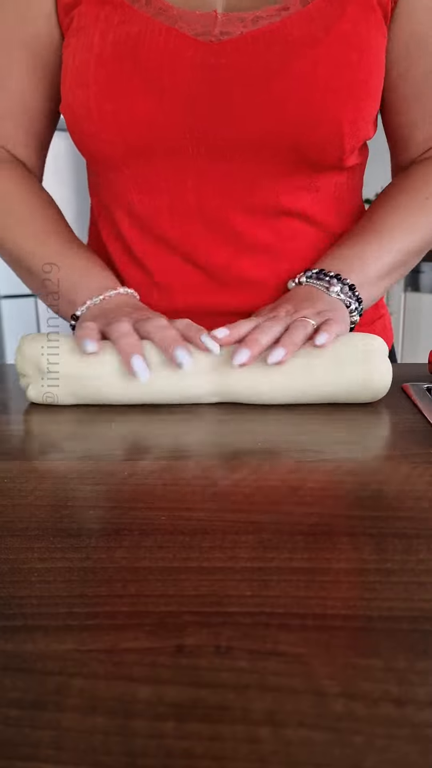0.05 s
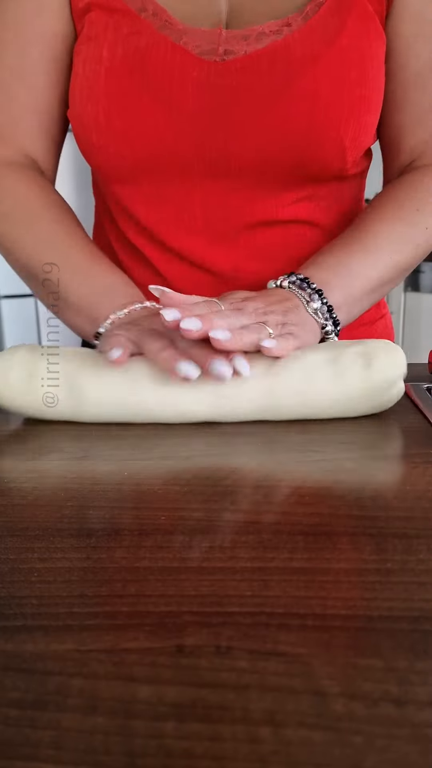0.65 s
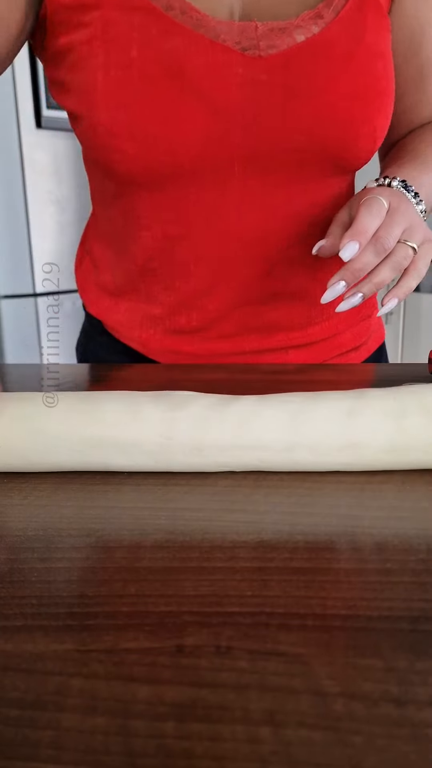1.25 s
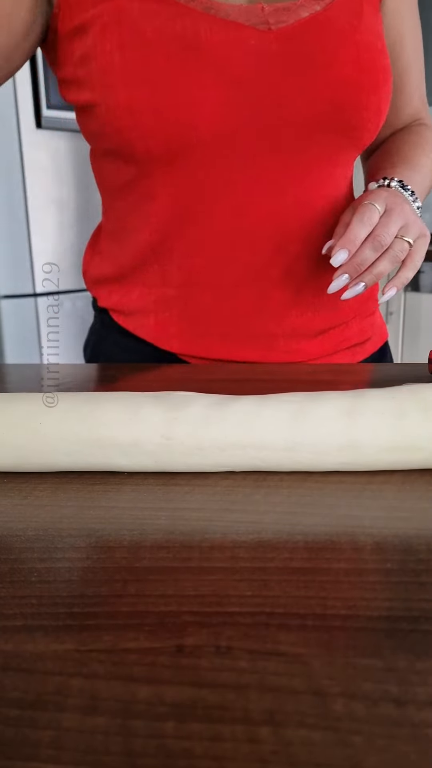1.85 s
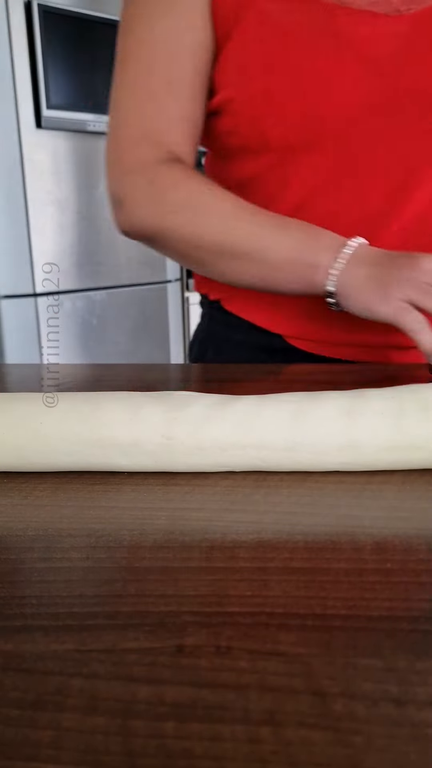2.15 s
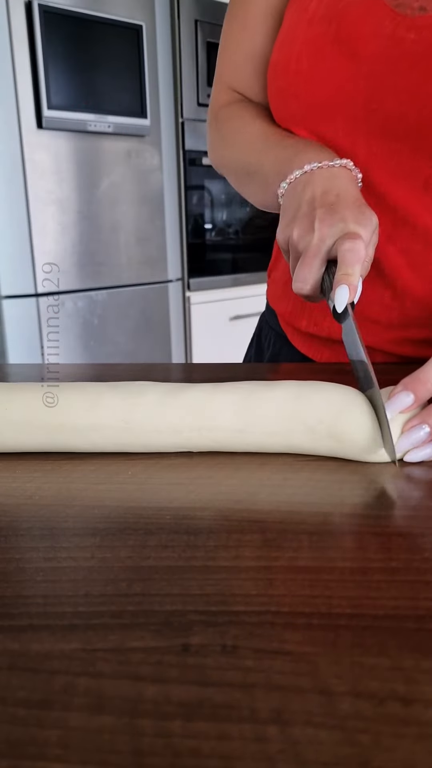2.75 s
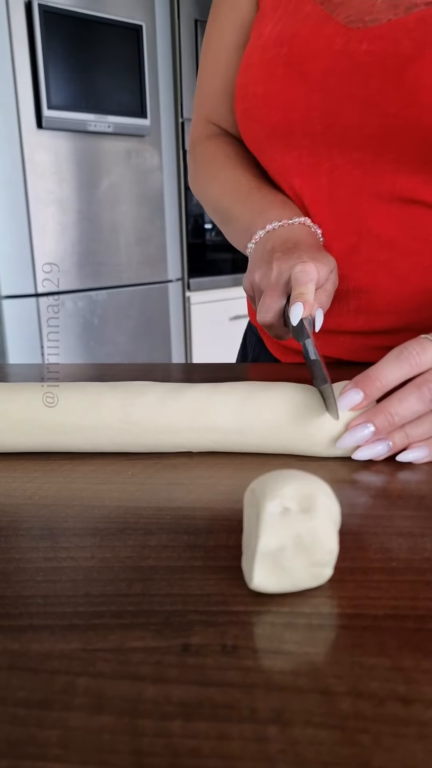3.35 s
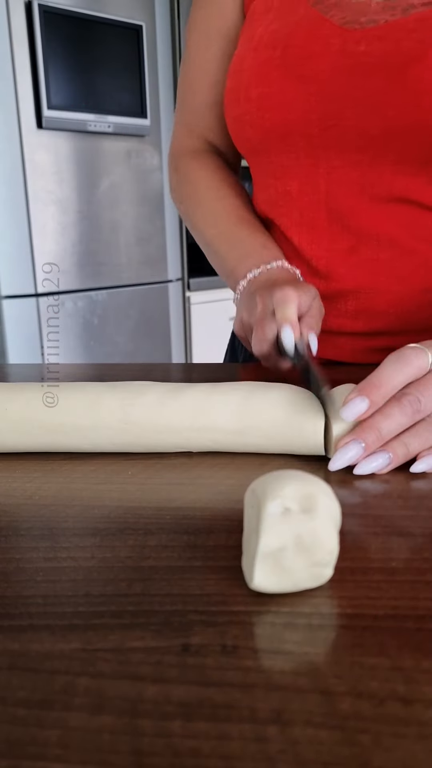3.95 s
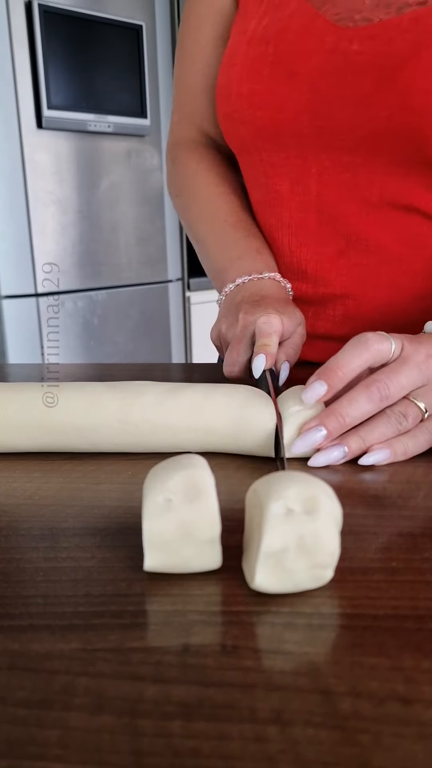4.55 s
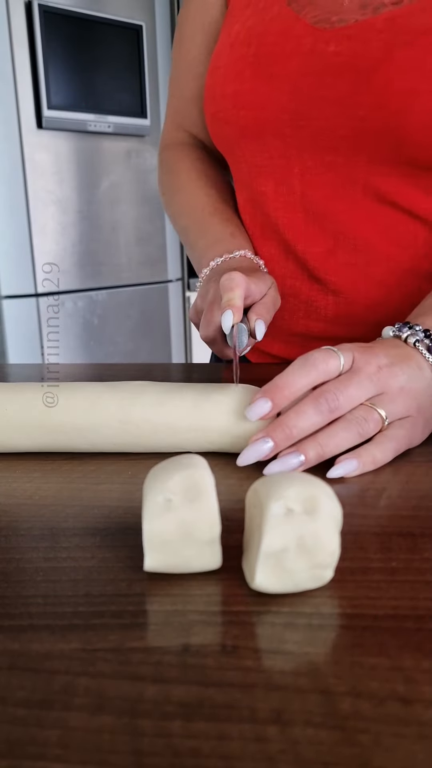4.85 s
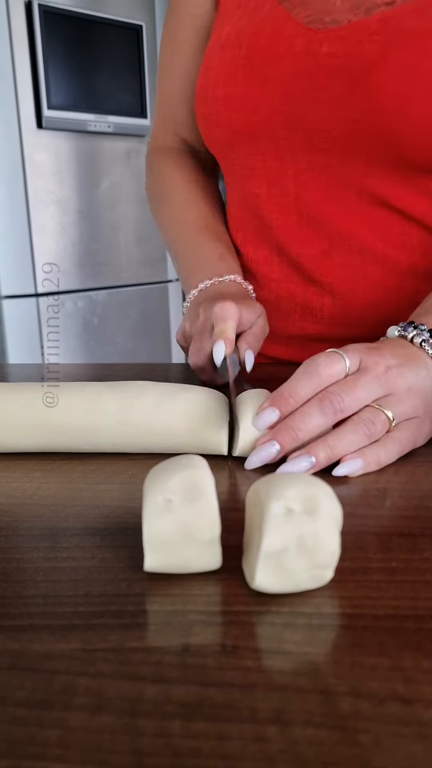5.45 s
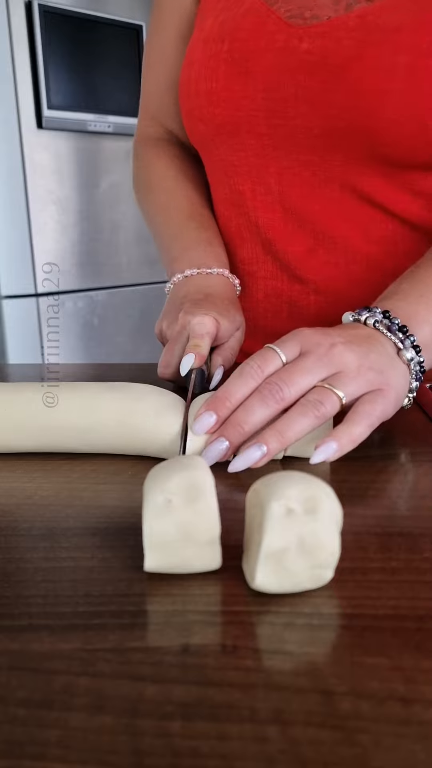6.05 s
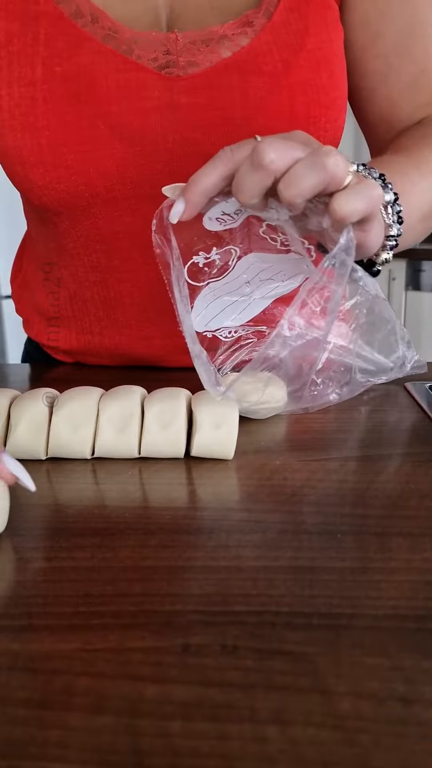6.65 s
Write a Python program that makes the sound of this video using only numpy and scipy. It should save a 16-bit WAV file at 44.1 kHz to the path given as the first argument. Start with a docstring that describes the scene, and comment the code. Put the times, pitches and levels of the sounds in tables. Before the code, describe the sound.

For the first two seconds, palms slide over a roll of dough in faint, hissing strokes, with soft thuds around 1.0 and 1.6 seconds and small ticks of nails and bracelets on a wooden table. At about 2.4 seconds a knife is picked up with a bump and a quick double rasp. Five cuts follow, near 2.8, 3.6, 4.4, 5.3 and 6.1 seconds, each a sharp knock of blade on wood with a short kitchen echo. The last three are louder, with a brief gritty crunch leading into the knock. Between cuts the blade taps and scrapes lightly, ringing faintly just after 3 seconds and clicking several times around 4.7. A short, low hum from the table follows most strokes. From about 6.4 seconds a thin plastic bag crinkles with sharp snaps. Everything is close and in stereo, over very faint room tone.

```python
"""Palms hiss and pat over a roll of dough on a wooden kitchen table; nails and bracelets tick on the wood.
A knife is picked up and cuts five pieces: each impact excites the modes of blade and table and the
kitchen's reverberation, a short low hum follows most strokes, and the blade scrapes free by friction.
At the end a plastic bag is snatched up and its film crumples. Two close microphones pick up the sound."""
import sys
import numpy as np
from scipy import signal
from scipy.fft import rfft, irfft, next_fast_len
from scipy.io import wavfile

SR = 44100
rng = np.random.default_rng(int(sys.argv[2]) if len(sys.argv) > 2 else 0)


def unload_wav(signal):
    """Save mono or channel-first audio to the path in sys.argv[1] as 16-bit WAV at rate SR, clipped to [-1, 1]."""
    wavfile.write(
        sys.argv[1],
        SR,
        np.round(np.clip(np.atleast_2d(signal).T, -1, 1) * 32767).astype(np.int16),
    )


N = 295029
T = np.arange(N) / SR
SHORT = np.arange(8192) / SR  # time axis of one brief event


# modes of the table, and upper modes of the blade on the wood: f/Hz, bandwidth/Hz, level/dB
TABLE_MODES = [(160.6, 42, 3), (304.7, 41, -1), (391.8, 105, 1), (461, 57, -2), (576.5, 68, 0)]
BLADE_MODES = [(2757, 290, -12), (3600, 120, -12), (5785, 330, -19), (6430, 1000, -18.5)]
# knife strokes: t/s, grinding level/dB, table gain/dB, favoured table f/Hz, upper mode gain/dB,
# crack gain/dB, left minus right/dB, room feed/dB
CUTS = [(2.8264, -30.5, -1.5, 560, -17, -24.5, -1, -3.5), (3.6085, -31, -5, 492, -13.5, -20, 0, -2.5),
        (4.3872, -10.5, -13, 348, -11.5, -22, 1.5, -6), (5.2525, -8.5, -15, 332, -11.5, -20.5, 1.5, -6),
        (6.0705, -6.5, -15.5, 410, -34, -36, .5, -7)]

def cuts(knock_db=-9.2, crunch_s=0.0028, crunch_db=-20, favour_octaves=0.67):
    """Modal excitation: the edge grinds through dough, then hits wood. Returns direct sound, room feed."""
    direct, feed = np.zeros((2, 2, N))
    for piece, (s, grind_db, body_db, body_hz, upper_db, crack_db, pan_db, room_db) in enumerate(CUTS):
        # with each piece the edge grinds longer and its resonance rises and broadens
        grind_s = .0155 + piece * .0022
        edge_hz, width_hz = 1488 + piece * 50, 416 + piece * 78
        lead = 2 * grind_s
        t = SHORT - lead
        grind = grit(len(t)) * (t < 0) / (1 + np.exp(-(t + 0.87 * grind_s) / (0.16 * grind_s)))
        # one clean blow with a brief crunch behind it
        blow = microphones(signal.unit_impulse(len(t), int(lead * SR)))
        knock = blow + amp(crunch_db) * grit(len(t)) * (t >= 0) * np.exp(-np.abs(t) / crunch_s)
        # the point of impact favours some of the table's modes
        body = [(f, w, db - 6 * abs(np.log2(f / body_hz)) / favour_octaves) for f, w, db in TABLE_MODES]
        sound = 0
        for force, db, seconds in ((grind, grind_db, 0.68 * grind_s), (knock, knock_db, .003)):
            edge = signal.lfilter(*signal.butter(4, 1150, "high", fs=SR), force)
            blade = set_energy(resonate(edge, [(edge_hz, width_hz, 0)]), db, seconds)
            table = set_energy(resonate(force, body), db + body_db, seconds)
            upper = set_energy(resonate(force, BLADE_MODES), db + upper_db, seconds)
            broadband = colour(force, [(6500, -7), (10000, -6), (16000, -16)])
            crack = set_energy(broadband, db + crack_db, seconds)
            sound = sound + (blade + upper + crack) * pan(pan_db) + table
        add(direct, s - lead, sound)
        add(feed, s - lead, sound * amp(room_db))
    return direct, feed


# friction spectra of skin on dough and of dough on wood: f/Hz, level/dB
SKIN = [(800, -12), (1800, -6), (3000, 2.5), (4800, -0.5), (7400, 4), (8500, -0.5), (10000, -14),
        (13000, -42)]
DOUGH = [(100, -8.5), (200, -20), (280, 1), (430, -5), (850, -2.5), (1400, -1.5), (2000, -12.5),
         (4000, -30)]
# spectrum of a thin, very high hiss that accompanies each palm stroke: f/Hz, level/dB
HIGH_HISS = [(7000, -23), (9500, -13.5), (11700, 1), (15500, -2)]
# palm strokes, in relative levels: t/s, duration/s, skin level/dB, skin fade/(dB/s),
# high hiss level/dB, rubbing level/dB
STROKES = [(0.0, 0.03, -52, 0, -48.5, -67), (0.092, 0.025, -53, 0, -46.5, -79),
           (0.162, 0.12, -53, -8, -53.5, -54.5), (0.363, 0.081, -47.5, 17, -50, -63.5),
           (0.505, 0.099, -60, 0, -62.5, -65), (0.68, 0.07, -44, 78, -46, -56.5),
           (0.802, 0.083, -45.5, -2, -42, -55.5), (0.994, .26, -43.5, 18, -45.5, -46),
           (1.338, 0.18, -43, -10, -42.5, -52.5), (1.663, 0.22, -38, 64, -44, -48),
           (1.909, 0.069, -50, -7, -64, -54)]

def rolling(arch_db=2.5, firm_db=-45.5, firmness=0.72, waver_db=1.6, shift_db=4):
    """Friction noise: skin slides over dough, the roll rubs on wood. A thin high hiss goes with them."""
    skin_gain, high_gain, rub_gain = np.zeros((3, N))
    for s, length_s, skin_db, fade_db, high_db, rub_db in STROKES:
        arch = np.sin(np.pi * np.clip((T - s) / length_s, 0, 1)) - .5  # pressure peaks mid-stroke
        stroke = envelope(T - s, rise_s=0.014, hold_s=length_s, fall_s=0.026) * amp(arch_db * arch)
        skin_gain += stroke * amp(skin_db - fade_db * np.clip(T - s, 0, length_s))
        high_gain += stroke * amp(high_db)
        rub_gain += stroke * amp(rub_db)
    hiss = unit(colour(grit(N, rough_db=3), SKIN))
    # a light touch only whispers in the treble; firmer contact fills in the middle, and the grip wavers
    middle = signal.filtfilt(*signal.butter(2, 5000, fs=SR), hiss)
    grip = amp(waver_db * wander(rate_hz=30))
    fill = (skin_gain / amp(firm_db)) ** firmness * grip
    skin = (hiss - middle + middle * fill) * skin_gain
    high_hiss = unit(colour(grit(N, rough_db=-2.5), HIGH_HISS)) * high_gain
    friction, rub = grit(N, rough_db=4.5), 0
    for hz in np.geomspace(140, 1800, 12):  # the shifting contact patch reweights the resonances
        rub = rub + resonate(friction, [(hz, hz / 4, 0)]) * amp(shift_db * wander(rate_hz=14))
    rub = unit(colour(rub, DOUGH)) * rub_gain
    return amp(2.5) * skin + amp(3) * high_hiss + rub


# spectrum of dough under a palm: f/Hz, level/dB
THUD = [(50, -10), (120, -6.5), (200, -10.5), (290, 7.5), (430, -12), (850, -4), (1500, -11), (2500, -9),
        (6000, -26)]
# presses of the palms: t/s, level/dB
PATS = [(.37, -52.5), (.695, -58), (.95, -43), (1.0, -34.5), (1.5, -51), (1.618, -39), (1.676, -39),
        (1.92, -49)]

def pats():
    """Inelastic impact: each press squashes the dough with a soft thud."""
    force = sum(amp(db) * envelope(T - s, rise_s=0.013, hold_s=0, fall_s=0.036) for s, db in PATS)
    return unit(colour(grit(N, rough_db=1.5), THUD)) * force


# ticks of nails and beads: t/s, relative level/dB, f/Hz, left minus right/dB, treble/dB
NAILS = [(.105, -21.5, 6630, 1, 19), (.248, -7.5, 3150, -3.5, -7), (.51, -26.5, 6740, 2, 16),
         (0.649, -29, 7440, 0, 9), (.805, -20, 7220, -14, 17), (1.022, -16, 1520, -11, -1.5),
         (1.621, -16.5, 1580, -4, -1.5)]

def nails():
    """Hard impact: nails and bracelet beads touch the wood so briefly that the spectrum is broad."""
    out = np.zeros((2, N))
    for s, db, hz, pan_db, treble_db in NAILS:
        add(out, s, tick(db, hz, treble_db, bass_db=-21.5) * pan(pan_db))
    return out


# taps of the blade: t/s, relative level/dB, f/Hz, left minus right/dB, treble/dB
TAPS = [(2.323, -29, 2840, -1.5, -12), (2.377, -16, 3620, 1, -9), (3.492, -33, 5400, 4, 4),
        (3.878, -20, 1780, -1.5, -21), (3.913, -18.5, 3500, 1.5, -15), (3.946, -16.5, 3400, 2, -12.5),
        (4.11, -22.5, 3440, 10.5, -25.5), (4.323, -35.5, 3430, 1, -6), (4.659, -19.5, 3650, -3, -7),
        (4.67, -5.5, 3640, 1, -16), (4.718, -6.5, 3550, -1, -3.5), (4.783, -14.5, 3000, 1, -4.5),
        (4.859, -21, 2880, 1, -22.5), (5.165, -32.5, 4220, 2.5, 2.5), (5.544, -14.5, 1670, 0, -18)]

def blade_taps(slide_db=-18.5, lag_s=0.0044, rise_s=0.0096, fall_s=0.028):
    """Impact, then sliding friction: the blade taps the wood and slides on a little."""
    out = np.zeros((2, N))
    for s, db, hz, pan_db, treble_db in TAPS:
        add(out, s, tick(db, hz, treble_db, bass_db=-17.5) * pan(pan_db))
        add(out, *drag(s + lag_s, rise_s, fall_s, db + slide_db, .9 * hz, treble_db))
    return out


# modes of the free blade: f/Hz, relative level/dB, T60/s
FREE_BLADE = [(1000, 4.5, 0.15), (2600, -6, .08), (3560, -1.5, 0.23), (3950, -1, 0.075), (4662, -15, 0.25),
              (4700, -5, .14), (5500, -2.5, 0.14), (5790, -16.5, 0.44), (6794, -13, 0.14)]

def blade_ring(s=3.053, ring_db=-37, chatter_rad=0.68, chatter_hz=220):
    """Free vibration: one tap leaves the blade ringing; chatter against the wood modulates its phase."""
    out = np.zeros((2, N))
    add(out, s, tick(-18.5, hz=1990, treble_db=-29.5, bass_db=-10.5) * pan(-1))
    for hz, db, t60 in FREE_BLADE:
        phase = 2 * np.pi * (hz * SHORT + rng.random((2, 1)))
        noise = rng.standard_normal(phase.shape)
        chatter = unit(signal.lfilter(*signal.butter(2, chatter_hz, fs=SR), noise))
        add(out, s, amp(ring_db + db) * np.sin(phase + chatter_rad * chatter) * decay(SHORT, t60))
    return out


# drags over the wood: peak t/s, rise/s, fall/s, level/dB, f/Hz, treble/dB, left minus right/dB
SCRAPES = [(.252, 0.011, 0.027, -28.5, 3080, 0.5, 2), (.375, .014, 0.022, -42, 1500, -23, 5),
           (2.549, 0.017, 0.04, -52.5, 2990, -13, 4), (3.118, 0.021, .01, -39.5, 1580, -41.5, 3),
           (3.284, .027, 0.0031, -45.5, 2160, -10, 3), (4.146, 0.0093, 0.052, -44.5, 1820, -25.5, 3),
           (4.916, .023, 0.013, -33, 2080, -34.5, -0.5), (5.059, .011, 0.014, -52, 1570, -35.5, 0),
           (5.532, .012, 0.022, -26, 1600, -19, -0.5), (6.236, 0.0043, 0.012, -40.5, 7200, -2, 0)]

def scrapes():
    """Sliding friction: blade and fingers drag over the wood."""
    out = np.zeros((2, N))
    for s, rise_s, fall_s, db, hz, treble_db, pan_db in SCRAPES:
        start, sound = drag(s, rise_s, fall_s, db, hz, treble_db)
        add(out, start, sound * pan(pan_db))
    return out


# modes of the handle's bump on the table: f/Hz, bandwidth/Hz, level/dB
BUMP_MODES = [(244, 156, 6.5), (417, 100, 5.5), (682, 160, -2.5), (1055, 370, -23.5)]
# spectrum of the rasping edge: f/Hz, level/dB
RASP = [(88, -28.5), (150, -21), (466, -1), (1170, -23), (1480, -3), (1870, -20), (2180, -2), (2450, -19.5),
        (3220, -0.5), (3700, -4), (4240, -23), (7180, -14.5), (8730, -28.5), (12200, -20.5), (16000, -26)]
# catches of the edge: t/s, duration/s, level/dB
CATCHES = [(2.436, 0.0057, -16.5), (2.447, 0.0077, -12.5)]

def knife_pickup(bump_s=2.376, bump_db=-24, bump_fall_s=0.02):
    """Impact and friction: the handle bumps the table, then the edge catches twice as it is drawn off."""
    catches = sum(amp(db) * envelope(T - s, rise_s=0.0011, hold_s=length_s, fall_s=0.0013)
                  for s, length_s, db in CATCHES)
    out = unit(colour(grit(N), RASP)) * catches
    bump = resonate(grit(len(SHORT)) * np.exp(-SHORT / bump_fall_s), BUMP_MODES)
    add(out, bump_s, set_energy(bump, bump_db, bump_fall_s / 2))
    return out


# spectrum of crumpling plastic film: f/Hz, level/dB
FILM = [(29, -21), (50, -1), (119, 3.5), (203, -3.5), (428, -3), (545, -4), (842, -8), (1500, -8),
        (1780, -8), (7390, -8), (9410, -19.5), (11400, -13.5), (16000, -22)]
# single creases snapping: t/s, relative level/dB
SNAPS = [(6.428, -16.5), (6.457, -13), (6.509, -6.5), (6.627, -2)]

def bag(grab_s=6.43, lift_s=6.542):
    """Buckling: thin film creases in a dense rush while held, and hardest as it is lifted."""
    held = amp(-27.5) * envelope(T - grab_s, rise_s=0.0017, hold_s=.21, fall_s=0.042)
    lifted = amp(-9.5) * envelope(T - lift_s, rise_s=0.015, hold_s=0, fall_s=0.015)
    out = unit(colour(grit(N, rough_db=1.5), FILM)) * (held + lifted) * pan(-0.18)
    for s, db in SNAPS:
        add(out, s, tick(db, hz=5970, treble_db=3.5, bass_db=-6.5) * pan(-5))
    return out


# hums of the table: peak t/s, final f/Hz, level/dB, rumble gain/dB
HUMS = [(0.433, 76.3, -50.5, 2.5), (.695, 77, -48, -0.5), (1.346, 81.6, -54, 2.5), (2.151, 59.3, -51, -1),
        (2.401, 107.5, -48, 8), (3.15, 86.3, -29.5, -10), (3.863, 82.2, -33.5, -12),
        (4.544, 75.5, -29.5, -17), (5.374, 81.1, -26.5, -9.5)]

def table_hums(sag=.3, half_width_s=0.033):
    """Flexural vibration: shifting weight swings the table top over a rumble; the pitch drops, settles."""
    out = np.zeros((2, N))
    t = np.arange(SR // 2) / SR - 3 * half_width_s
    for s, hz, db, rumble_db in HUMS:
        pitch_hz = hz * (1 + sag * (1 - np.tanh(2 * t / half_width_s + 2)))
        swing = np.exp(-(t / half_width_s) ** 2) * np.sin(2 * np.pi * np.cumsum(pitch_hz) / SR)
        rumble = unit(colour(grit(len(t)), [(20, 3), (60, -1.5), (160, -2), (300, -26.5), (900, -61)]))
        rumble *= amp(rumble_db) * np.exp(-(t / (1.3 * half_width_s)) ** 2)
        add(out, s + t[0], amp(db) * (swing + rumble))
    return out


# spectrum of the kitchen's reverberation: f/Hz, level/dB
KITCHEN = [(60, -5.5), (140, 9.5), (210, 2), (420, 2.5), (650, -4), (830, 2), (1100, -2.5), (1500, -4.5),
           (2100, 1), (2650, -3.5), (3600, 1.5), (4600, -2.5), (5600, -2.5), (8000, -4.5), (10000, -8)]

def kitchen(x, build_s=0.0068, t60_s=0.65, treble_t60_s=0.56):
    """Reverberation: cupboards and tiles build a diffuse field whose treble dies first."""
    t = np.arange(SR) / SR
    reflections = grit(len(t), wide_hz=621) * (1 - np.exp(-t / build_s))
    low = signal.filtfilt(*signal.butter(2, 3000, fs=SR), reflections)
    tail = low * decay(t, t60_s) + (reflections - low) * decay(t, treble_t60_s)
    response = colour(set_energy(tail, 0, 1 / SR), KITCHEN)
    return signal.fftconvolve(x, response, axes=-1)[:, :N]


# spectrum of the still kitchen: f/Hz, level/dB
AMBIENT = [(15, -54), (25, -13.5), (64, -4.5), (157, -14), (317, -21), (354, -22.5), (416, -14),
           (591, -26.5), (796, -15.5), (887, -23), (1330, -21), (1560, -21.5), (6210, -27.5), (8140, -35.5),
           (16000, -48.5)]

def room_tone(db=-60.5):
    """Ambient noise: a faint, steady floor, strongest in the bass."""
    return amp(db) * unit(colour(grit(N), AMBIENT))


def tick(db, hz, treble_db, bass_db, decay_s=0.0031):
    """Impact transient: a fast-decaying burst excites a hard contact."""
    burst = grit(len(SHORT)) * np.exp(-SHORT / decay_s)
    return set_energy(contact(burst, hz, treble_db, bass_db), db - 10, 0.005)


def drag(s, rise_s, fall_s, db, hz, treble_db):
    """Roughness noise that swells until time s and dies away. Returns its start and its sound."""
    lead = min(3 * rise_s, s)
    t = np.arange(SR // 3) / SR - lead
    rasp = unit(contact(grit(len(t), rough_db=3), hz, treble_db, bass_db=-11, ring_db=-5))
    return s - lead, amp(db) * rasp * envelope(t, rise_s, 0, fall_s)


def contact(x, hz, treble_db, bass_db, ring_db=4):
    """Contact resonance: a short ring on a broad hump between a bass and a treble shelf."""
    hump_hz = min(hz, 7000)
    outline = [(60, bass_db - 22), (300, bass_db), (hump_hz / 2, -3), (hump_hz, 0),
               (8000, treble_db - 1.5), (9800, treble_db - 15.5), (15000, treble_db - 8)]
    return colour(x, outline) + resonate(x, [(hz, 380, ring_db)])


def grit(n, rough_db=0, wide_hz=1100):
    """Noise with grains of uneven size; the channels decorrelate above wide_hz."""
    mid, side = rng.standard_normal((2, n))
    side = signal.lfilter(*signal.butter(2, wide_hz, "high", fs=SR), side)
    sizes = amp(rough_db * np.minimum(rng.exponential(size=n // 16 + 1), 4))
    stereo = microphones(mid) + 0.99 * np.array([side, -side])
    return unit(stereo * np.repeat(sizes, 16)[:n])


def microphones(x, most_rad=0.81, corner_hz=820):
    """Phase lag of the left microphone: a short delay in the bass, a bounded offset in the treble."""
    n = 2 * next_fast_len(len(x) // 2 + 1)
    lag = np.exp(-1j * most_rad * np.tanh(np.fft.rfftfreq(n, 1 / SR) / corner_hz))
    return np.array([irfft(rfft(x, n) * lag)[:len(x)], x])


def resonate(x, modes):
    """Superposition of modes (f/Hz, bandwidth/Hz, level/dB), each filtered twice for steep skirts."""
    out = 0
    for hz, width, db in modes:
        b, a = signal.iirpeak(hz, hz / (1.396 * width), fs=SR)
        out = out + amp(db) * signal.lfilter(b, a, signal.lfilter(b, a, x))
    return out


def colour(x, points, size=4096):
    """Minimum-phase filter with an outline of (f/Hz, level/dB)."""
    hz, db = np.transpose(points)
    f = np.fft.rfftfreq(size, 1 / SR) + 1
    cepstrum = irfft(np.log(amp(np.interp(np.log(f), np.log(hz), db))))
    cepstrum[1:size // 2] *= 2
    cepstrum[size // 2 + 1:] = 0
    response = irfft(np.exp(rfft(cepstrum)))
    return signal.oaconvolve(x, response[None], axes=-1)[:, :x.shape[-1]]


def envelope(t, rise_s, hold_s, fall_s):
    """Exponential attack up to t = 0, hold, exponential release."""
    return np.exp(np.minimum(np.minimum(t / rise_s, (hold_s - t) / fall_s), 0))


def decay(t, t60_s):
    """Exponential damping by 60 dB in t60_s."""
    return np.exp(-np.log(1000) * t / t60_s)


def wander(rate_hz):
    """Slow random modulation."""
    return np.interp(T * rate_hz, np.arange(512), rng.standard_normal(512))


def set_energy(sound, db, seconds):
    """Give both channels the energy of a burst of this level and length."""
    return amp(db) * sound * np.sqrt(seconds * SR / np.sum(sound ** 2, axis=-1, keepdims=True))


def amp(db):
    """Decibels to gain."""
    return 10 ** (np.asarray(db) / 20)


def unit(x):
    """Scale to rms 1."""
    return x / np.sqrt(np.mean(x ** 2) + 1e-20)


def pan(db):
    """Constant-power gains for a left minus right level difference."""
    return unit(amp([[db / 2], [-db / 2]]))


def add(out, s, sound):
    """Mix a sound in at time s."""
    i = max(int(s * SR), 0)
    out[:, i:i + sound.shape[-1]] += sound[:, :max(N - i, 0)]


def scene():
    """Superposition: direct sound of hands, knife and bag, the reverberation and the ambient noise."""
    knife, feed = cuts()
    small_sounds = nails() + blade_taps() + blade_ring() + scrapes() + table_hums()
    direct = knife + rolling() + pats() + small_sounds + knife_pickup() + bag()
    return direct + kitchen(feed + amp(-16) * small_sounds) + room_tone()


# difference between the microphones' responses: f/Hz, left minus right/dB
MISMATCH = [(650, -0.5), (1400, -2.5), (2200, 0.5), (4200, -2), (8000, -0.5), (13000, 4.5)]

def record(dry, top_hz=15900):
    """Transduction: each microphone colours the sound above the bass, overloads clip, the top is cut."""
    difference = [(200, 0)] + MISMATCH
    left = colour(dry[[0]], [(hz, db / 2) for hz, db in difference])
    right = colour(dry[[1]], [(hz, -db / 2) for hz, db in difference])
    clipped = np.clip(np.vstack([left, right]), -1, 1)
    return signal.sosfilt(signal.ellip(8, .2, 70, top_hz, fs=SR, output="sos"), clipped)


dry = scene()
out = record(dry)
unload_wav(out)
```